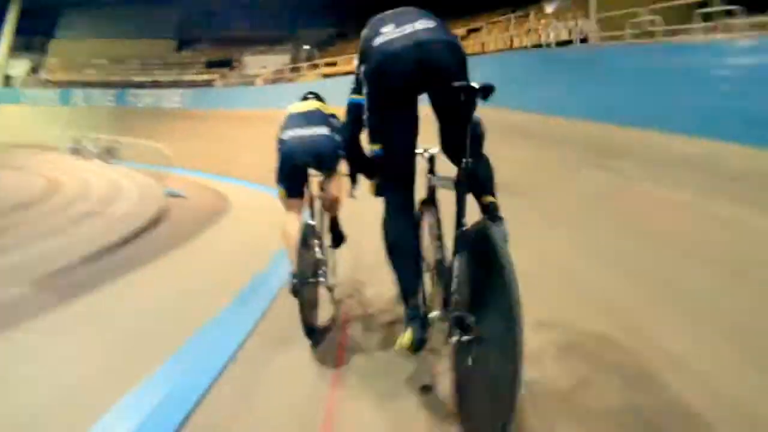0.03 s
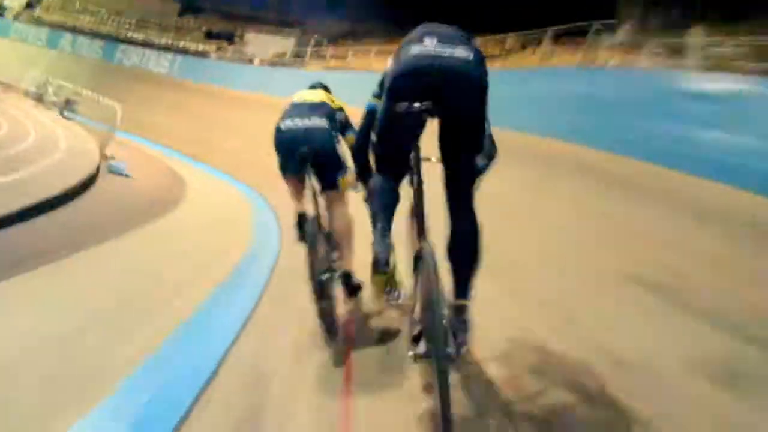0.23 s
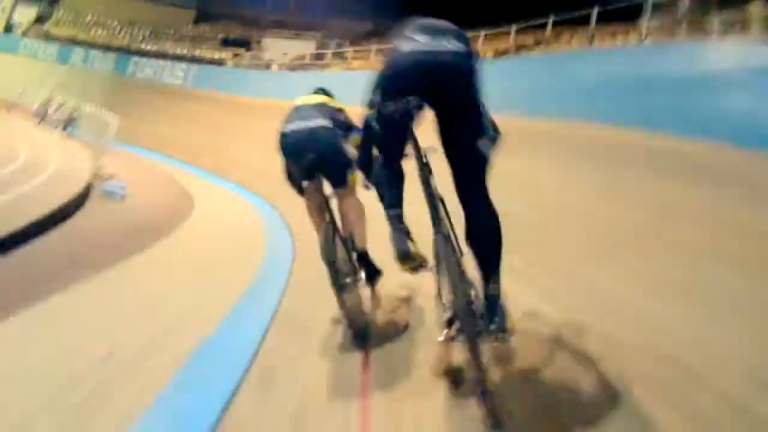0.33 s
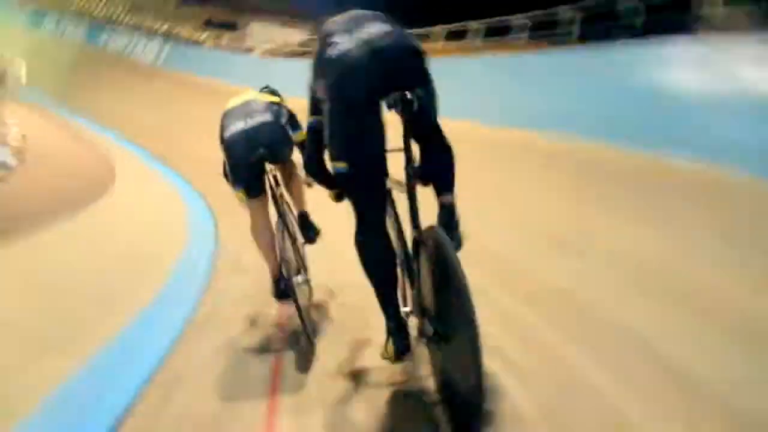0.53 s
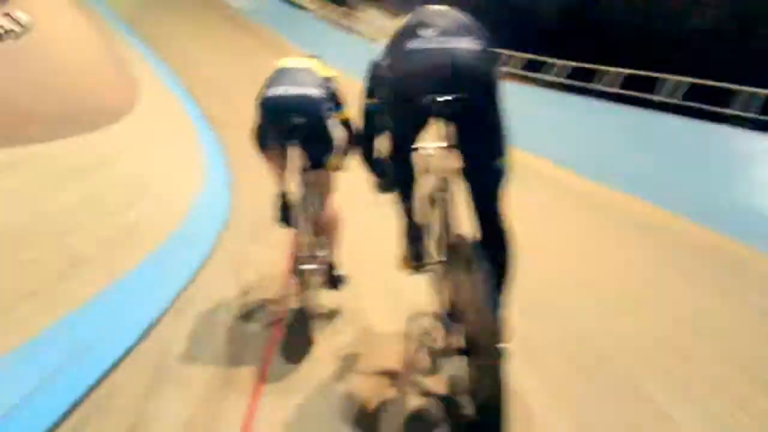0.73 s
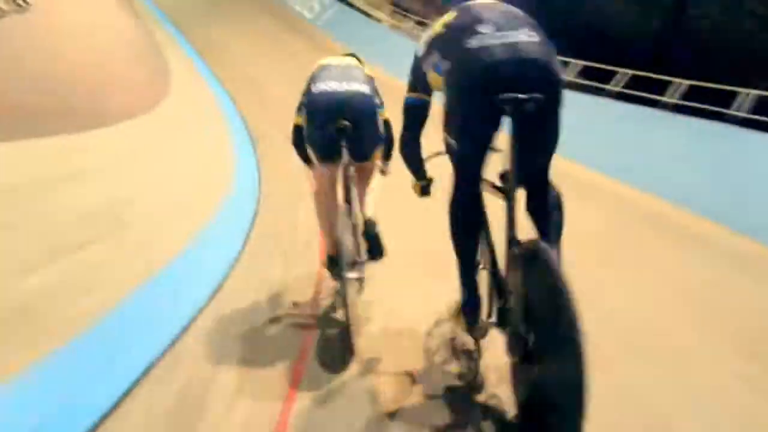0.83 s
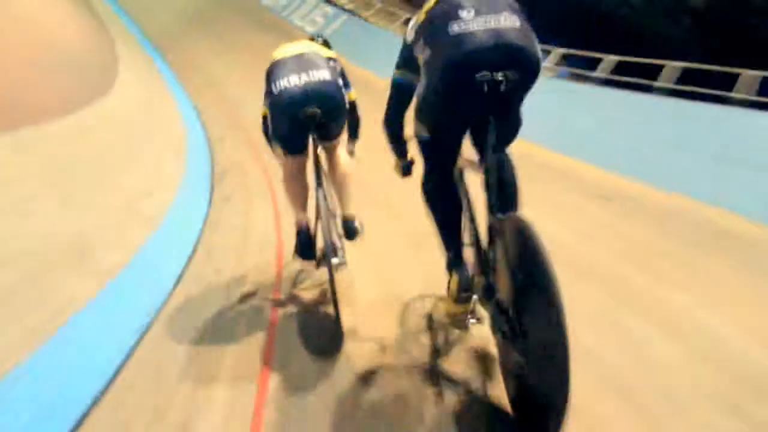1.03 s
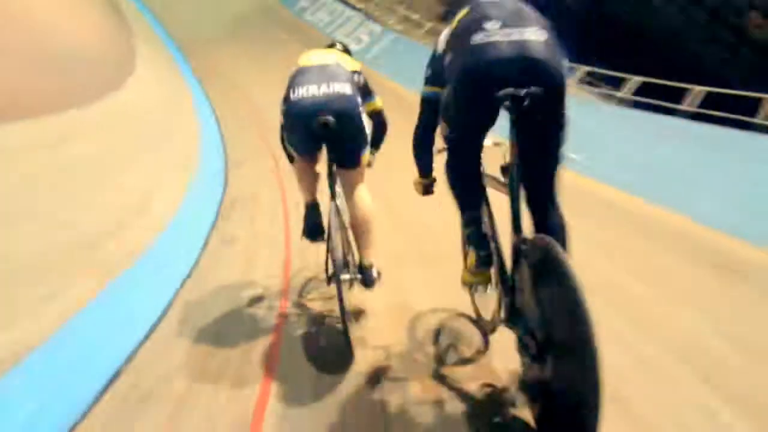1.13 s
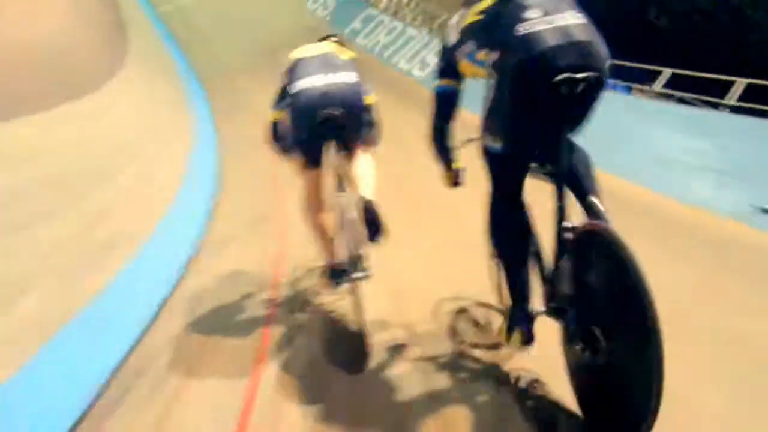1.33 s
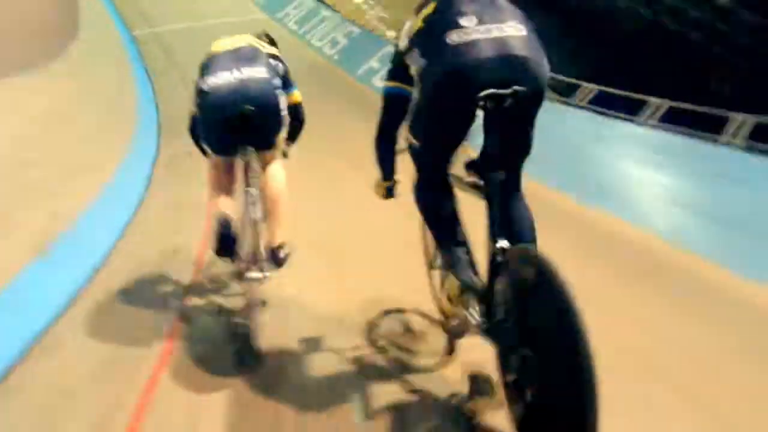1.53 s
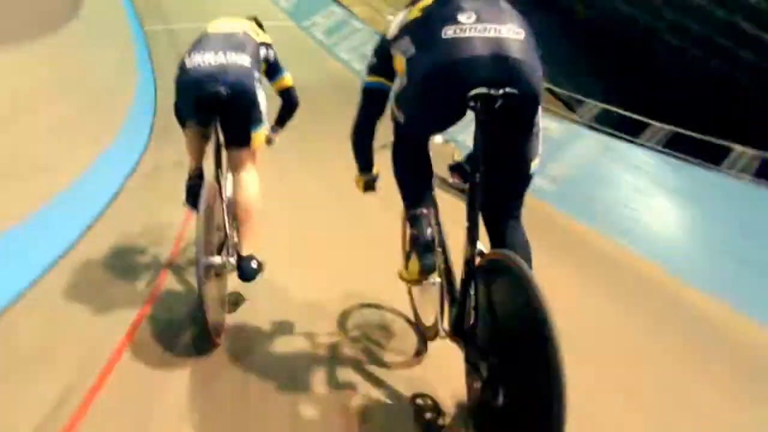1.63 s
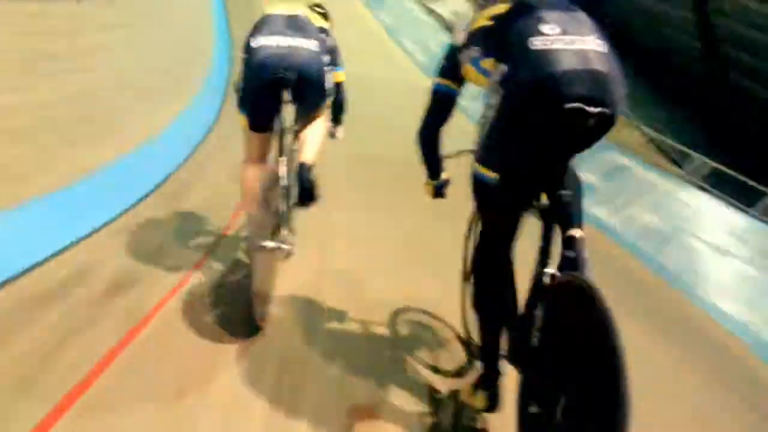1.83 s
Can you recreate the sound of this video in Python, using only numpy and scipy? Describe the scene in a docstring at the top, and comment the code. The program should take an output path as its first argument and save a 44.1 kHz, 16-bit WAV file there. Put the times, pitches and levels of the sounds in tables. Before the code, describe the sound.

Wind noise on a moving microphone builds over the lumpy rumble of bicycle wheels on an indoor track. Gusts thump and briefly overload the microphone, then the airflow breaks into slaps and crackles and fades.

```python
"""Wind on a microphone, riding a bicycle round a banked indoor track.
The airflow swells to a smooth, bright rush over a lumpy rumble of eddies and wheels;
big eddies thump the microphone into overload. Then the flow breaks up: it flutters,
tears and slaps, crackling with sudden pressure steps as it dies away."""
import sys
import numpy as np
from scipy import signal
from scipy.fft import rfft, irfft
from scipy.io import wavfile
from scipy.ndimage import uniform_filter1d

SR = 44100
rng = np.random.default_rng(int(sys.argv[2]) if len(sys.argv) > 2 else 0)


def store_pcm(level_fs):
    """Save levels as 16-bit WAV."""
    pcm = np.round(np.clip(level_fs, -1, 1) * 32767).astype(np.int16)
    wavfile.write(sys.argv[1], SR, np.atleast_2d(pcm).T)


N = 83790

# strength of the airflow, the fader on hiss and crackle together: t/s, level/dB
FLOW_LEVEL = [(0, -38.5), (.2, -37.5), (.44, -31.5), (.58, -26.5), (.69, -19.5), (.78, -18), (.83, -21.5),
              (.9, -13.5), (1.0, -15.5), (1.08, -13.5), (1.18, -17), (1.21, -22.5), (1.3, -27.5),
              (1.34, -33.5), (1.47, -34), (1.54, -33), (1.622, -38), (1.636, -43.5), (1.72, -43.5),
              (1.9, -51.5)]
# how ragged the flow is: t/s, flutter depth/dB
FLUTTER_DEPTH = [(0, 0.3), (.45, 1.6), (.7, 0.75), (1.15, 2), (1.25, 2), (1.35, 4), (1.6, 3.0), (1.9, 3)]
# crackle within the rush, ahead of its trim: t/s, level/dB
CRACKLE_LEVEL = [(0, 2.5), (.45, 3), (.7, -7), (1.15, -4), (1.24, 11), (1.45, 8.5), (1.9, 14.5)]
# pressure steps thin out as the flow breaks up: t/s, rate/(steps per s)
CRACKLE_RATE = [(0, 1900), (1.15, 2300), (1.26, 650), (1.6, 400), (1.9, 370)]
# bright tone of the rushing air: f/Hz, relative level/dB
HISS_SPECTRUM = [(60, -14), (200, 1.5), (500, -1.5), (1000, -5), (2000, -8), (4000, -12), (8000, -15.5),
                 (13000, -16), (16000, -25)]
# big eddies that thump the microphone: t/s, level/dB, half length/s
BUFFETS = [(0.164, -16, 0.0036), (0.231, -6.5, 0.0043), (0.365, -17, 0.0076), (0.443, -7.5, 0.0064),
           (0.529, -6, 0.0036), (0.628, -1, 0.0046), (0.723, -9.5, .003), (0.819, -1, 0.0049),
           (0.855, -11, 0.0079), (.916, 9, 0.005), (1.066, -3, 0.0055), (1.095, -4, 0.0057),
           (1.159, -2.5, 0.0065), (1.232, -4.5, 0.0069), (1.338, -11, .008), (1.425, -6, 0.0066),
           (1.628, -14, 0.0038), (1.697, -13, 0.0033)]
# dark tone inside a big eddy: f/Hz, relative level/dB
CHURN_SPECTRUM = [(40, 3), (120, -8.5), (200, -4.5), (400, -13.5), (1200, -44), (5000, -70)]
# short rips as the flow breaks up: t/s, level/dB, half length/s
TEARS = [(1.193, 3.5, 0.0009), (1.224, -9.5, 0.0059), (1.294, -13, 0.003), (1.324, -16, 0.0038),
         (1.328, -23.5, 0.0019), (1.359, -18.5, 0.0023), (1.404, -17.5, 0.002), (1.747, -27, 0.0011),
         (1.808, -31.5, 0.0019), (1.856, -39, .004)]
# hard slaps as the flow jumps off the microphone port: t/s, level/dB, decay/s
SLAPS = [(1.198, 0, 0.0052), (1.226, 2, .002), (1.275, 3, 0.00042), (1.286, -7, 0.00066),
         (1.477, -5.5, 0.0013), (1.589, -16, 0.00087), (1.609, -11, .0015)]
# low bed of wind and wheels, ahead of its trim: t/s, level/dB
RUMBLE_LEVEL = [(0, -24.5), (.1, -24.5), (.23, -20.5), (.4, -20), (.57, -19.5), (.66, -12), (.77, -17.5),
                (.85, -8.5), (.99, -11), (1.08, -9), (1.22, -13.5), (1.3, -16.5), (1.49, -16),
                (1.56, -23.5), (1.74, -26.5), (1.9, -36)]
# tone of that bed: f/Hz, relative level/dB
RUMBLE_SPECTRUM = [(12, -2.5), (25, -9.5), (45, 3.5), (70, -4.5), (105, -6), (170, -8), (300, -18),
                   (600, -28), (1500, -49.5)]

HISS_TRIM_DB, CRACKLE_TRIM_DB, RUMBLE_TRIM_DB = 3.5, -3, 0.5


def rush():
    """Air tearing past the microphone port: bright hiss and crackle, fluttering together."""
    hiss = from_db(HISS_TRIM_DB) * coloured_noise(HISS_SPECTRUM)
    steps = pressure_steps(envelope(CRACKLE_RATE), leak_hz=185)
    crackle = from_db(CRACKLE_TRIM_DB + envelope(CRACKLE_LEVEL)) * steps
    return from_db(envelope(FLOW_LEVEL)) * flutter() * (hiss + crackle)


def flutter(fast_hz=243, sway_hz=58, sway_share=0.51):
    """Unsteady flow shakes the level, fast and slow at once; deeper where the flow is ragged."""
    depth_db = envelope(FLUTTER_DEPTH)
    gain = from_db(depth_db * (drift(fast_hz) + sway_share * drift(sway_hz)))
    return gain / np.exp((depth_db * np.log(10) / 20) ** 2)   # keeps the mean power about even


def pressure_steps(per_s, leak_hz, spread_db=2.5):
    """Crackle: sudden jumps of pressure, of random size and sign, each leaking away; rms 1."""
    sizes = from_db(spread_db * np.minimum(rng.exponential(1, N), 3))
    signs = rng.choice([-1, 1], N)
    onsets = rng.random(N) < per_s / SR
    jumps = sizes * signs * onsets / np.sqrt(per_s)   # sparser steps hit harder
    return rms_one(signal.lfilter([1], [1, -np.exp(-2 * np.pi * leak_hz / SR)], jumps))


def buffets(churn_share=0.24):
    """Each big eddy sucks at the port as its core passes, pushes before and after, and churns inside."""
    thumps = np.zeros(N)
    churn = churn_share * coloured_noise(CHURN_SPECTRUM)
    for at_s, db, half_s in BUFFETS:
        from_core = (np.arange(N) / SR - at_s) / half_s
        thumps += from_db(db) * (from_core ** 2 - 1 + churn) * np.exp(-from_core ** 2 / 2)
    return thumps


def tears(hiss_share=0.5):
    """The flow rips apart in brief swells of dense pressure steps and hiss."""
    t = np.arange(N) / SR
    swells = sum(from_db(db) * np.exp(-((t - at_s) / half_s) ** 2 / 2) for at_s, db, half_s in TEARS)
    crackle = pressure_steps(per_s=3400, leak_hz=408)
    return swells * (crackle + hiss_share * coloured_noise(HISS_SPECTRUM))


def slaps(attack_s=0.00006, grit=0.26):
    """The flow jumps off the port: sudden, gritty drops of pressure that leak away in milliseconds."""
    drops = np.zeros(N)
    for at_s, db, decay_s in SLAPS:
        age = np.maximum(np.arange(N) / SR - at_s, 0)
        drops -= from_db(db) * (1 - np.exp(-age / attack_s)) * np.exp(-age / decay_s)
    return drops * (1 + grit * coloured_noise(HISS_SPECTRUM))


def rumble(levelling_s=0.15):
    """Eddies and rolling wheels lay down a lumpy low bed, its slow swings levelled out before the fader."""
    lumps = coloured_noise(RUMBLE_SPECTRUM)
    local_rms = np.sqrt(uniform_filter1d(lumps ** 2, int(levelling_s * SR)) + 1e-9)
    return from_db(RUMBLE_TRIM_DB + envelope(RUMBLE_LEVEL)) * lumps / local_rms


def coloured_noise(spectrum):
    """Noise with the given tone, rms 1."""
    hz, db = np.transpose(spectrum)
    bin_hz = np.maximum(np.arange(N // 2 + 1) * SR / N, 1)
    eq = from_db(np.interp(np.log(bin_hz), np.log(hz), db))
    return rms_one(irfft(rfft(rng.standard_normal(N)) * eq, N))


def drift(hz):
    """Smooth random wobble up to about this rate, peaks rounded off, rms 1."""
    pole = np.exp(-2 * np.pi * hz / SR)
    wobble = signal.lfilter([1], [1, -2 * pole, pole * pole], rng.standard_normal(2 * N))
    settled = rms_one(wobble[N:])
    return rms_one(np.tanh(settled / 2))


def envelope(rows):
    """Breakpoints joined by straight lines, at every sample."""
    return np.interp(np.arange(N) / SR, *np.transpose(rows))


def from_db(db):
    """Decibels to gain."""
    return 10 ** (np.asarray(db) / 20)


def rms_one(x):
    """Scale to rms 1."""
    return x / np.sqrt(np.mean(x ** 2) + 1e-20)


def scene():
    """The mono mix: all the pressure at the one microphone port."""
    return (rush() + tears() + slaps() + rumble() + buffets())[None]


def record(dry):
    """The microphone overloads, so big thumps choke the hiss; a steep low-pass cuts the top."""
    ceiling, knee_hardness, cutoff_hz = 0.97, 5, 15700
    clipped = dry / (1 + np.abs(dry / ceiling) ** knee_hardness) ** (1 / knee_hardness)
    low_pass = signal.ellip(12, .1, 80, cutoff_hz, fs=SR, output="sos")
    return signal.sosfilt(low_pass, clipped)


dry = scene()
out = record(dry)
store_pcm(out)
```